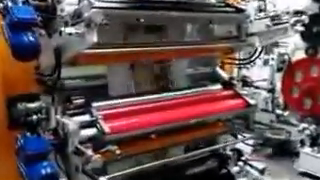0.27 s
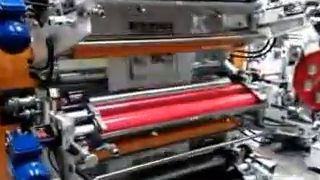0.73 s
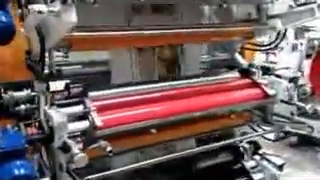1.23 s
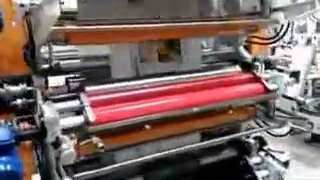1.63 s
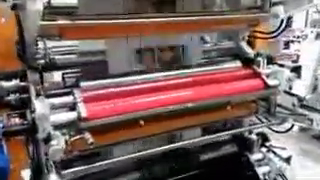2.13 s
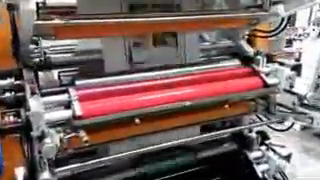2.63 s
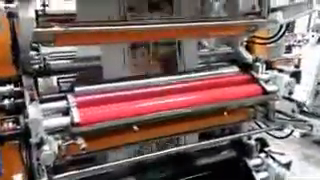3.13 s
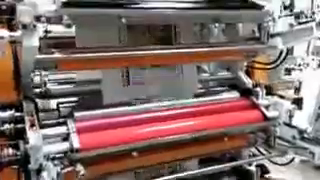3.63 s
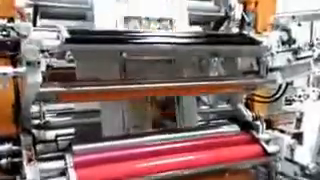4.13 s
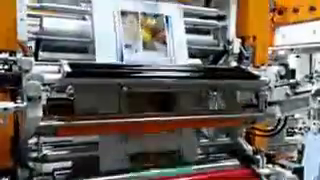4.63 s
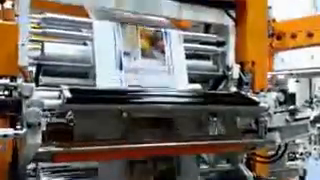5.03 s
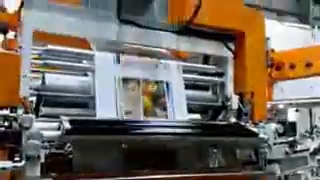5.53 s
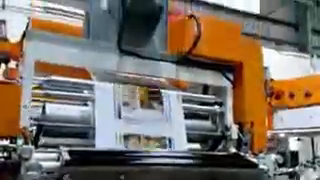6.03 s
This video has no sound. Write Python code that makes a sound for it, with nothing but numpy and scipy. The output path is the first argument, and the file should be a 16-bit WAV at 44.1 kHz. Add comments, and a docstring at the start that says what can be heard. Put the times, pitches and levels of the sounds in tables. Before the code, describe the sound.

Loud constant machine hiss and metallic gear whirr with faint high whine in a factory hall, two pneumatic blow-offs within the first second.

```python
"""A broad roar of fans, film web and far machines fills a factory hall where a printing press runs.
Roar, film hiss and valve air are coloured noise. Gears are random tooth impulses ringing resonances,
most swelling once per cylinder turn. Motors are thin wandering sines; a pneumatic valve blows off twice early on.
One microphone slowly tilts upward: gear chatter grows and the treble shifts."""
import sys
import numpy as np
from scipy import signal
from scipy.fft import rfft, irfft, next_fast_len
from scipy.io import wavfile

SR = 44100
rng = np.random.default_rng(int(sys.argv[2]) if len(sys.argv) > 2 else 0)


def magnitude_from_level(level_db):
    """Linear magnitude for a level in decibels (20 dB per decade)."""
    exponent = np.asarray(level_db, float) / 20
    return 10 ** exponent


def pcm_store(signal):
    """Save signal as 16-bit PCM."""
    levels = np.round(np.clip(np.atleast_2d(signal), -1, 1) * 32767)
    wavfile.write(sys.argv[1], SR, levels.astype(np.int16).T)


N = 276948
TIME_S = np.arange(N) / SR


def rms_one(x):
    """Scale to unit power."""
    return x / np.sqrt(np.mean(x ** 2) + 1e-20)


def drift(corner_hz):
    """Slow random curve of rms 1: noise through two equal one-pole lowpasses."""
    hop = 40
    settle = 2000
    pole = np.exp(-2 * np.pi * corner_hz * hop / SR)
    noise = rng.standard_normal(N // hop + settle + 2)
    slow = signal.lfilter([1], [1, -2 * pole, pole * pole], noise)[settle:]
    return np.interp(np.arange(N) / hop, np.arange(len(slow)), rms_one(slow))


def coloured(spectrum):
    """Noise of rms 1, shaped by a spectrum interpolated over log frequency."""
    size = next_fast_len(N)
    hz, level_db = np.transpose(spectrum)
    log_hz = np.log(np.arange(size // 2 + 1) * SR / size + 1)
    shape = magnitude_from_level(np.interp(log_hz, np.log(hz), level_db, left=-90, right=-90))
    noise = rng.standard_normal(size)
    return rms_one(irfft(rfft(noise) * shape, size)[:N])


def turn(swell):
    """Gain whose power rises and falls once per cylinder turn; mean power 1."""
    turns_per_s, first_peak_s = 5.095, 0.09
    swell = np.clip(swell, 0, 0.95)
    return np.sqrt(1 + swell * np.cos(2 * np.pi * turns_per_s * (TIME_S - first_peak_s)))


# blur of fans, film and far machines: pitch_hz, relative_db_per_hz
ROAR_SPECTRUM = [(15, -67.5), (25, -31.5), (50, -24), (90, -9), (142, -5), (267, -8.5), (425, -5),
                 (692, -6), (1340, -2.5), (1840, -2), (2080, -7), (2290, -2.5), (4880, -9), (6080, -16),
                 (7040, -21), (7960, -23.5), (8560, -11.5), (11100, -74), (18800, -120)]


def roar(treble_db):
    """Broad noise wash with fluttering level; its treble follows the microphone's tilt."""
    level_db, flutter_db = -24, 0.8
    wash = coloured(ROAR_SPECTRUM)
    highpass = signal.butter(2, 6000, "high", fs=SR, output="sos")
    treble = signal.sosfilt(highpass, wash)
    tilted = wash + (magnitude_from_level(treble_db) - 1) * treble
    return magnitude_from_level(level_db + flutter_db * drift(3.0)) * tilted


# blade and film hiss: pitch_hz, relative_db_per_hz
FILM_SPECTRUM = [(2500, -25), (3500, -0.5), (5000, -15), (6500, -14), (8000, -31), (8700, -31)]


def film(treble_db):
    """Thin noise hiss of film and blade against the cylinders, swelling with each turn."""
    level_db = -37.5
    return magnitude_from_level(level_db + treble_db) * turn(1) * coloured(FILM_SPECTRUM)


def ring_teeth(resonances, strengths, uneven_db):
    """Dense random tooth impulses ring narrow resonances, each drifting in level; rms 1."""
    teeth_per_s, tooth_spread_db = 3000, 2.5
    out = np.zeros(N)
    for (hz, width_hz), (level_db, swell) in zip(resonances, strengths):
        teeth = (rng.random(N) < teeth_per_s / SR) * rng.choice([-1, 1], N)
        teeth = teeth * magnitude_from_level(tooth_spread_db * rng.exponential(1, N))
        teeth = teeth * turn(swell) * magnitude_from_level(uneven_db * drift(2.75))
        r = np.exp(-1.5 * np.pi * width_hz / SR)
        zeros = [(1 - r * r) / 2, 0, (r * r - 1) / 2]
        poles = [1, -2 * r * np.cos(2 * np.pi * hz / SR), r * r]
        peak = zeros + poles
        out += magnitude_from_level(level_db) * signal.sosfilt([peak, peak], teeth)  # twice: steep flanks, dark valleys
    return rms_one(out)


# resonances of frame and guards: pitch_hz, width_hz
FRAME_RESONANCES = [(145, 40), (424, 22), (485, 14), (530, 50), (850, 70), (1090, 40), (1212, 45),
                    (1272, 40), (1335, 45), (1390, 55), (1606, 45), (1700, 55), (5598, 35), (7980, 110)]
# strength of each: relative_db, swell_per_turn (0-1)
FRAME_STRENGTHS = [(-14, .1), (1, 0.7), (-5, 0), (-8, 0.5), (-11.5, 0), (-1.5, 0), (-3.5, 0.4), (-0.5, 0.6),
                   (-5, 0.7), (0.5, 0.7), (2, 0.8), (0.5, 1), (-11, 0.7), (-21.5, 1)]


def frame_gears():
    """Gear teeth ring frame and guards, louder as the microphone tilts toward the upper rollers."""
    start_db, growth_db_per_s = -30.5, 0.305
    level_db = start_db + growth_db_per_s * TIME_S
    return magnitude_from_level(level_db) * ring_teeth(FRAME_RESONANCES, FRAME_STRENGTHS, uneven_db=1.1)


# resonances of the steady whirr: pitch_hz, width_hz
WHIRR_RESONANCES = [(1968, 40), (2035, 50), (2100, 70)]
# strength of each: relative_db, swell_per_turn (0-1)
WHIRR_STRENGTHS = [(1, 0), (-5.5, 0.15), (0, 0.39)]


def whirr_gears():
    """Gear teeth ring a steady whirr near 2 kHz, more evenly over the turn."""
    level_db = -32
    return magnitude_from_level(level_db) * ring_teeth(WHIRR_RESONANCES, WHIRR_STRENGTHS, uneven_db=1.3)


def sine(hz, wander_hz):
    """A tone of rms 1 whose pitch wanders a little."""
    cycles = np.cumsum(hz + wander_hz * drift(1.27)) / SR
    return np.sqrt(2) * np.sin(2 * np.pi * (cycles + rng.random()))


def spell(from_s, to_s):
    """Rises softly toward 1 between two times, then falls back to 0."""
    edge_s = 0.2
    rise = np.tanh((TIME_S - from_s) / edge_s)
    fall = np.tanh((TIME_S - to_s) / edge_s)
    return (rise - fall) / 2


# motor and drive tones: pitch_hz
TONE_PITCHES = [160.2, 426.6, 588.1, 639.3, 1468, 3999.8, 6170.6, 8064.2, 8321.2]
# motion of each: wander_hz, swell_per_turn (0-1)
TONE_MOTION = [(.6, .1), (2.5, .9), (.3, .1), (.8, .1), (3, .3), (.2, .1), (.3, .2), (.3, .4), (.5, .3)]
# one spell each, from drifting through standing waves: outside_db_rms, spell_gain_db, from_s, to_s
TONE_SPELLS = [(-61, 12, 1.2, 6.6), (-45, 2, 3.3, 4.3), (-48, 8, 5.2, 6.8), (-46.5, 2.5, 1.4, 2.3),
               (-49, 7, .9, 6.6), (-55, 9, 4.4, 6.2), (-59, 8, 1.4, 3.3), (-61, 10, 1.4, 3.6),
               (-69, 11, 4.4, 6.1)]
# faint tones without spells: pitch_hz, level_db_rms
FAINT_TONES = [(212.6, -60), (316.3, -57), (359.3, -56), (483.2, -55), (5964.7, -60), (6102, -62),
               (7933.6, -65), (8026.5, -65)]


def motors():
    """Rotor, fan and drive sines, each wavering in level as echoes beat with it."""
    beat_db = 1.2
    out = np.zeros(N)
    for hz, (wander_hz, swell), (level_db, gain_db, from_s, to_s) in zip(
            TONE_PITCHES, TONE_MOTION, TONE_SPELLS):
        tone_db = level_db + gain_db * spell(from_s, to_s) + beat_db * drift(3.1)
        out += magnitude_from_level(tone_db) * turn(swell) * sine(hz, wander_hz)
    for hz, level_db in FAINT_TONES:
        out += magnitude_from_level(level_db + beat_db * drift(1.5)) * sine(hz, wander_hz=0.4)
    return out


# blow-offs: start_s, jet_db, rise_s, hold_s, t60_s, exhaust_re_jet_db
BLOW_OFFS = [(.135, -25.5, .045, .06, 1.5, -3.5), (.65, -25, .025, .04, 2, -7)]
# air jet: pitch_hz, relative_db_per_hz
JET_SPECTRUM = [(900, -25.5), (1800, -10), (3200, 1), (5000, -4), (7000, -11.5), (8700, -14)]
# hollow exhaust under it: pitch_hz, relative_db_per_hz
EXHAUST_SPECTRUM = [(300, -23.5), (550, -8.5), (900, -5.5), (1300, -16), (2000, -36)]


def valve():
    """Noise bursts: air rushes out, holds, then dies away exponentially in the hall."""
    out = np.zeros(N)
    jet, exhaust = coloured(JET_SPECTRUM), coloured(EXHAUST_SPECTRUM)
    for start_s, jet_db, rise_s, hold_s, t60_s, exhaust_db in BLOW_OFFS:
        age_s = TIME_S - start_s
        rise = np.clip(age_s / rise_s, 0, 1)
        decay_s = np.maximum(age_s - rise_s - hold_s, 0)
        envelope = rise * magnitude_from_level(-60 * decay_s / t60_s)
        out += magnitude_from_level(jet_db) * envelope * (jet + magnitude_from_level(exhaust_db) * exhaust)
    return out


# treble gain as the microphone tilts: time_s, gain_db
TREBLE_GAIN = [(0, 0.5), (1.2, -2.5), (2.8, 3), (4.2, -4), (5.2, -2.5), (6.28, -3)]


def scene():
    """All sources reach one microphone; both channels are equal."""
    treble_db = np.interp(TIME_S, *np.transpose(TREBLE_GAIN))
    mono = roar(treble_db) + film(treble_db)
    mono = mono + frame_gears() + whirr_gears()
    mono = mono + motors() + valve()
    return np.array([mono, mono])


# typical rounding step of spectral magnitude: pitch_hz, step_db_per_hz
ROUNDING_STEPS = [(3000, -95), (5000, -76), (6000, -72), (7000, -73), (7700, -75), (8400, -78), (8800, -80)]


def round_spectrum(x):
    """Rounds spectral magnitudes to whole steps: faint treble breaks into short tones and gaps."""
    frame_size, bins_per_band, step_spread_db = 4096, 16, 3.5
    window = dict(fs=SR, window="cosine", nperseg=frame_size, scaling="psd")
    hz, frame_s, spectrum = signal.stft(x, **window)
    band = np.arange(len(hz)) // bins_per_band
    # each band draws a new step in each frame
    spread_db = step_spread_db * rng.standard_normal((band[-1] + 1, len(frame_s)))[band]
    step_db = np.interp(hz, *np.transpose(ROUNDING_STEPS))[:, None] + spread_db
    steps = np.abs(spectrum) / magnitude_from_level(step_db) + 1e-12
    rounded = spectrum * np.floor(steps + 0.35) / steps
    return signal.istft(rounded, **window)[1][:, :N]


def top_cut(x):
    """Nothing passes above the cut-off."""
    return signal.sosfilt(signal.butter(12, 8710, fs=SR, output="sos"), x)


def record(dry):
    """A steep lowpass, 60 dB down from 9300 Hz, precedes the spectral rounding."""
    lowpass = signal.cheby2(12, 60, 9300, fs=SR, output="sos")
    mix = round_spectrum(signal.sosfilt(lowpass, dry))
    return top_cut(mix)


dry = scene()
out = record(dry)
pcm_store(out)
```